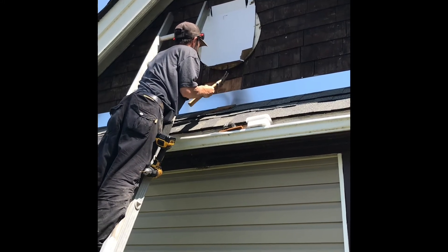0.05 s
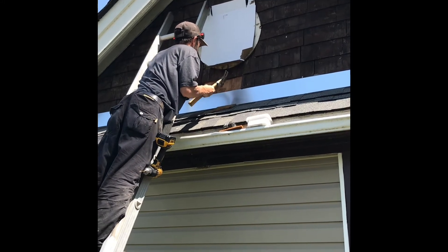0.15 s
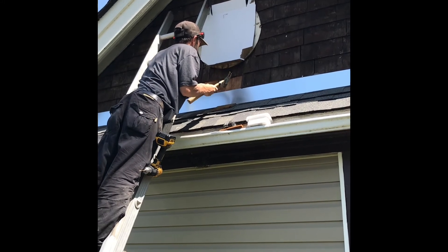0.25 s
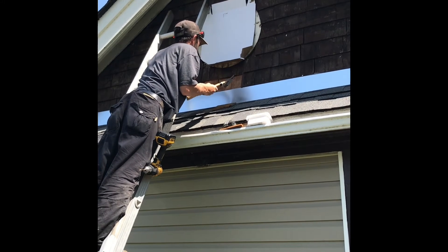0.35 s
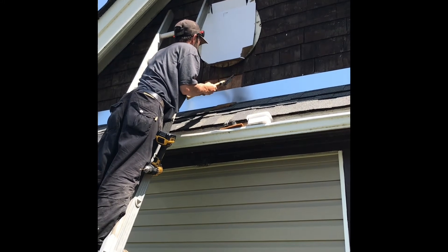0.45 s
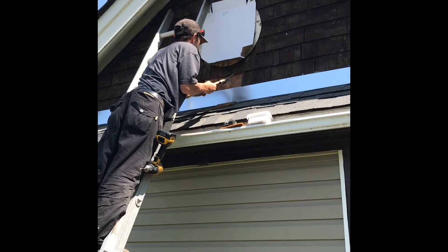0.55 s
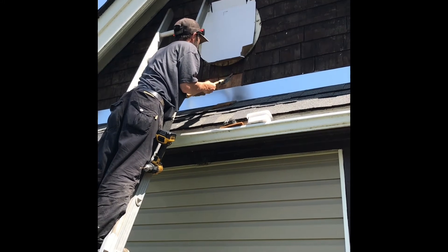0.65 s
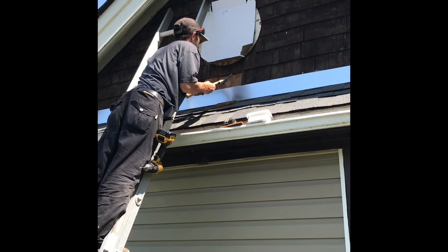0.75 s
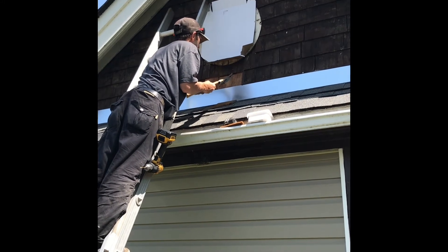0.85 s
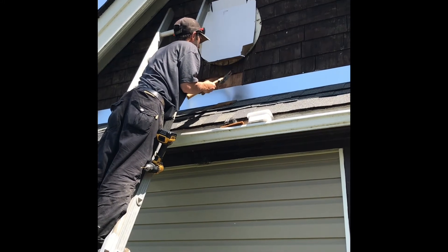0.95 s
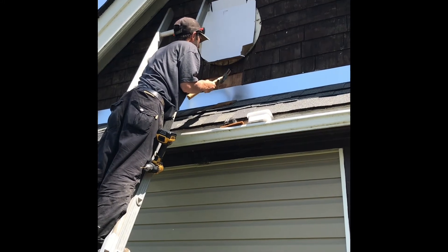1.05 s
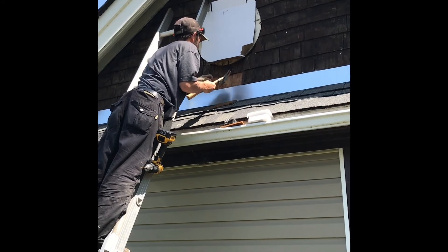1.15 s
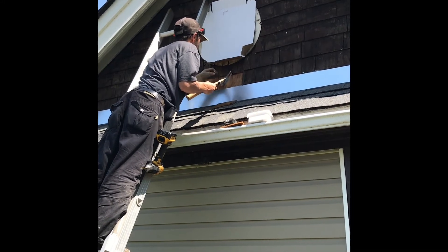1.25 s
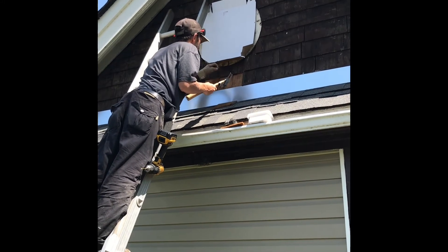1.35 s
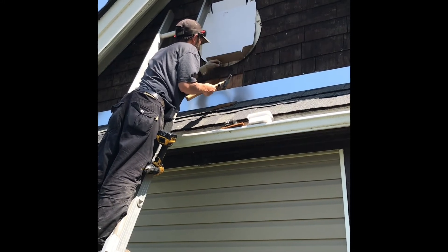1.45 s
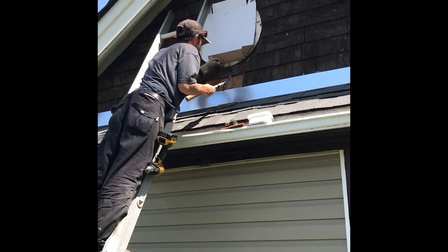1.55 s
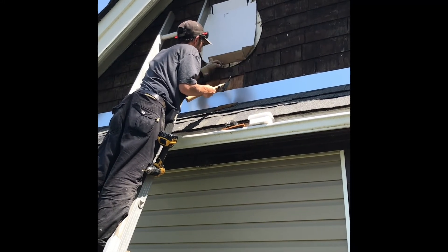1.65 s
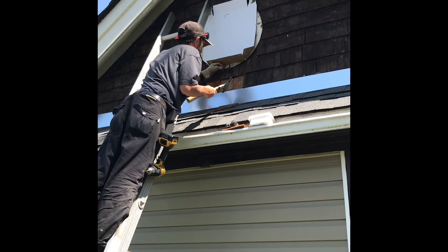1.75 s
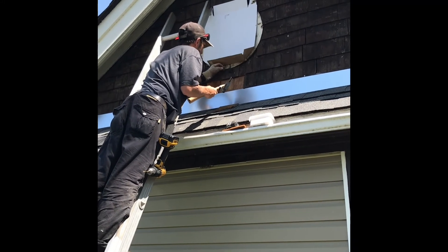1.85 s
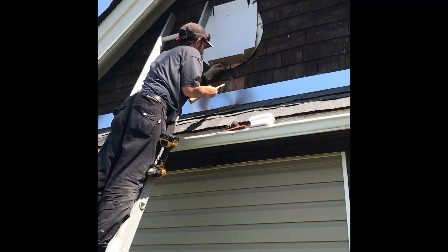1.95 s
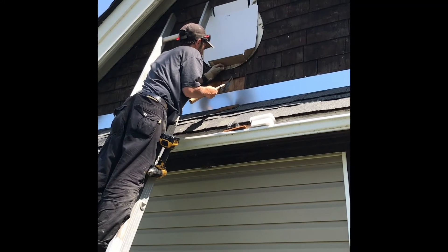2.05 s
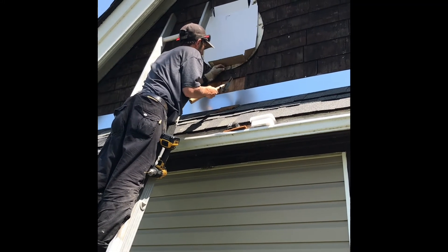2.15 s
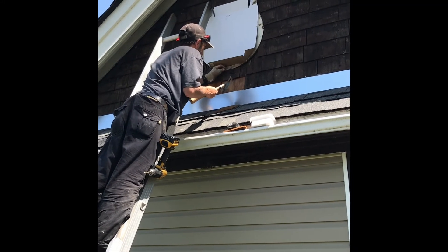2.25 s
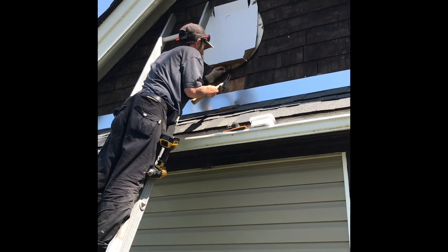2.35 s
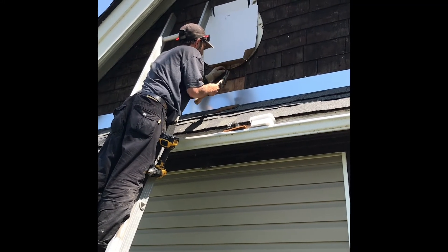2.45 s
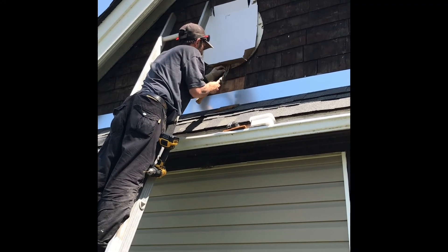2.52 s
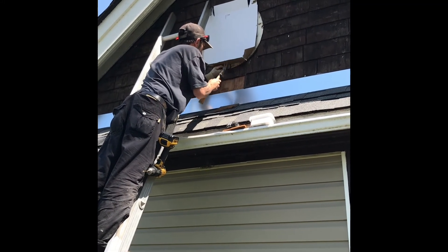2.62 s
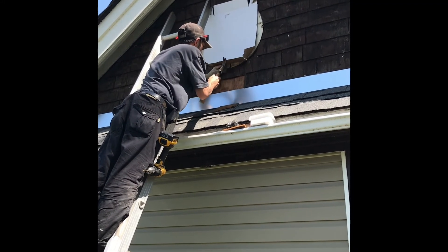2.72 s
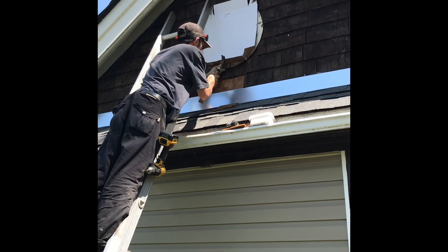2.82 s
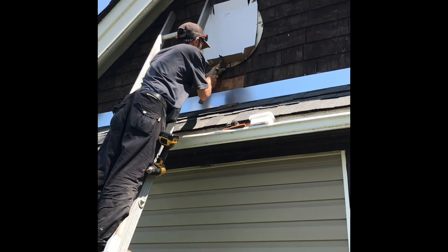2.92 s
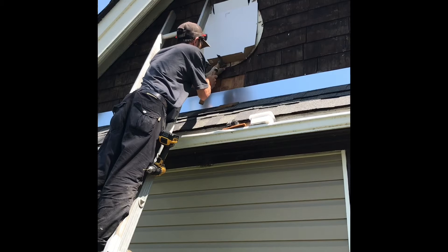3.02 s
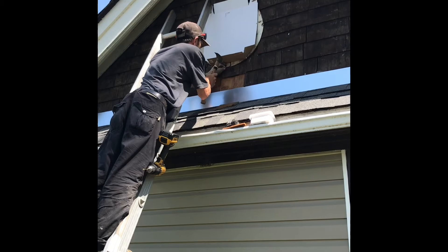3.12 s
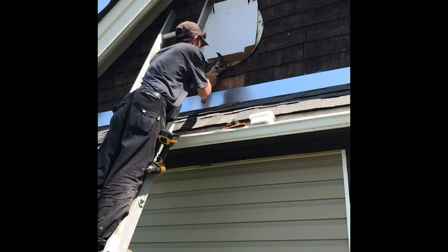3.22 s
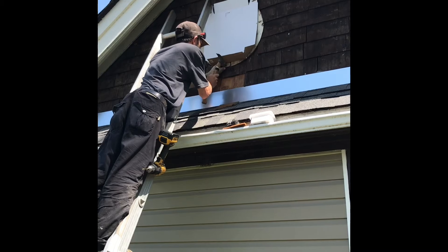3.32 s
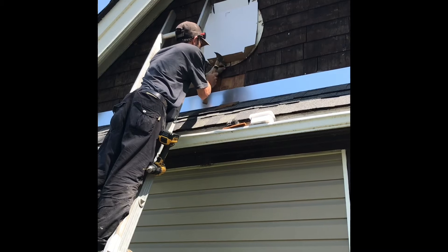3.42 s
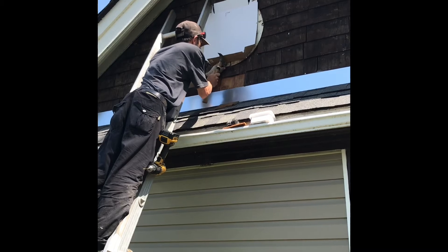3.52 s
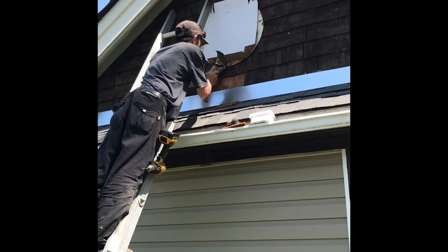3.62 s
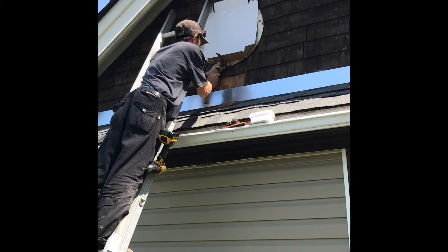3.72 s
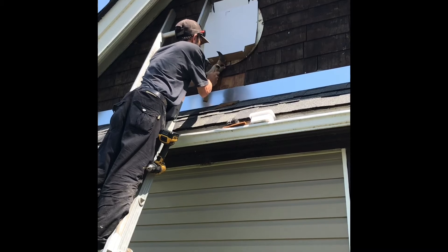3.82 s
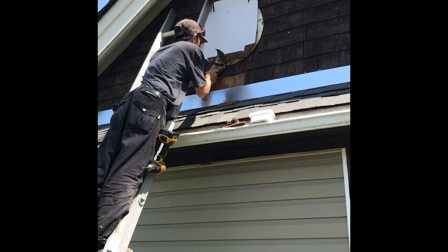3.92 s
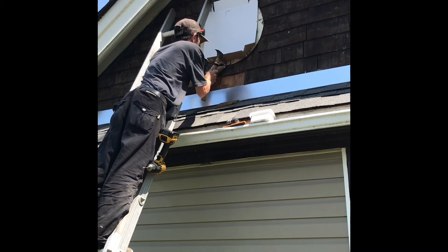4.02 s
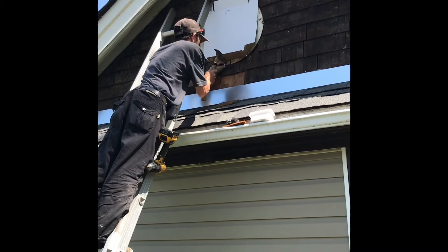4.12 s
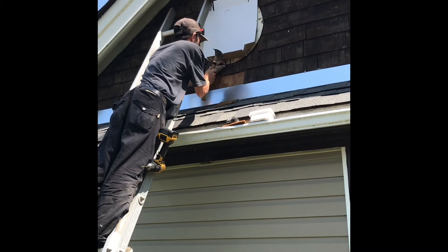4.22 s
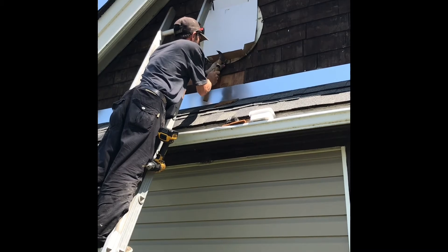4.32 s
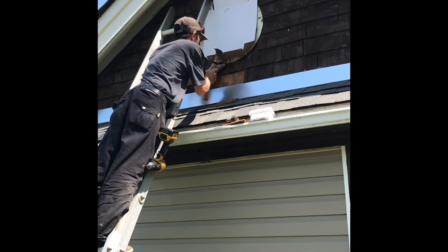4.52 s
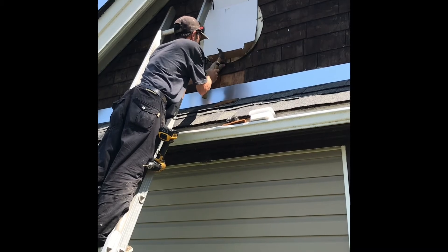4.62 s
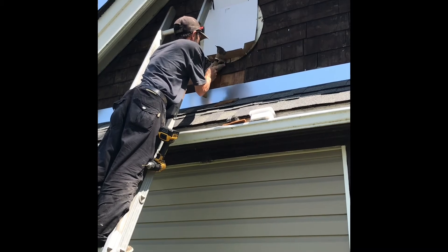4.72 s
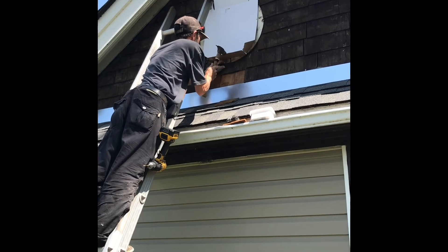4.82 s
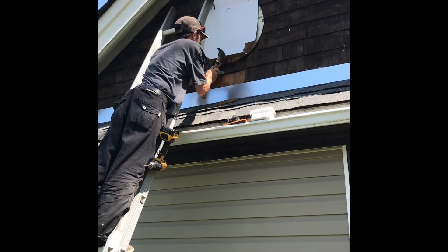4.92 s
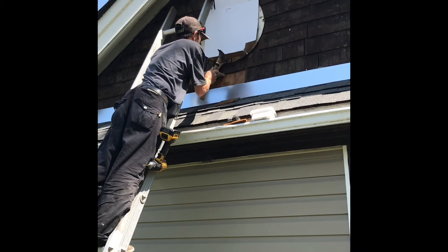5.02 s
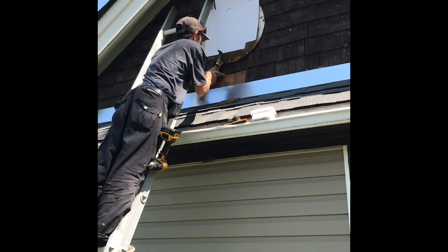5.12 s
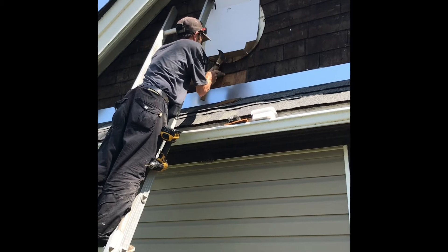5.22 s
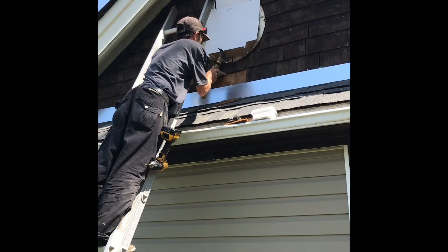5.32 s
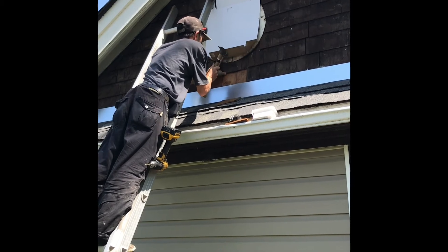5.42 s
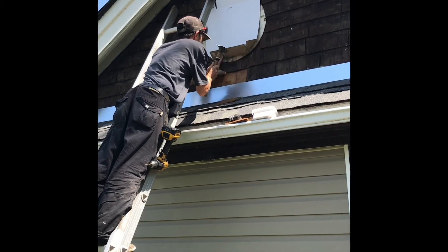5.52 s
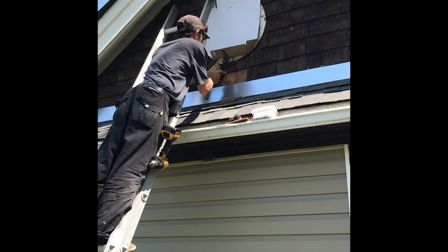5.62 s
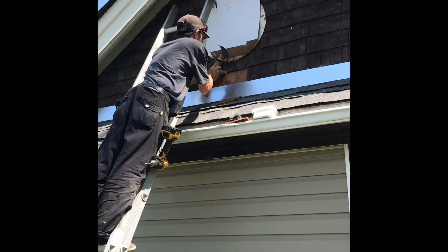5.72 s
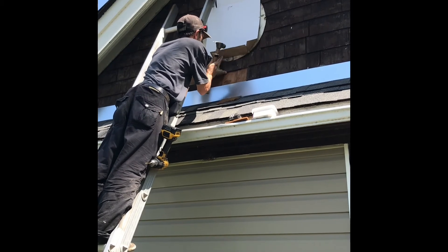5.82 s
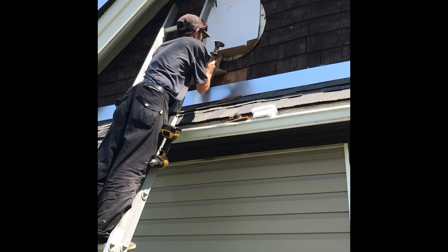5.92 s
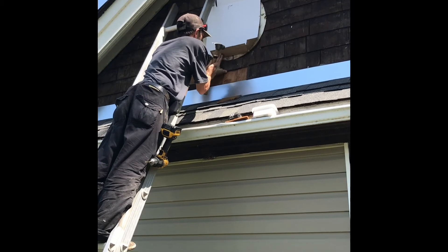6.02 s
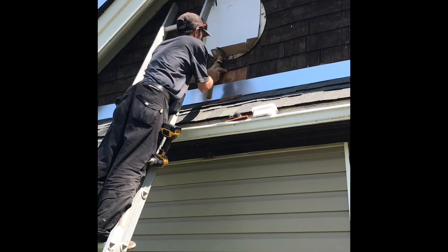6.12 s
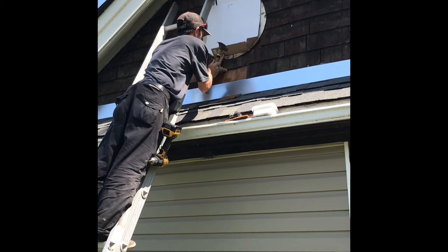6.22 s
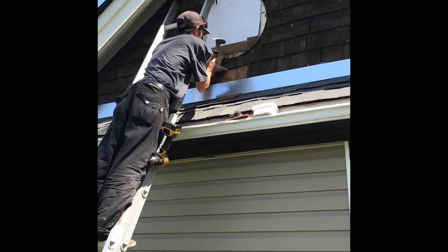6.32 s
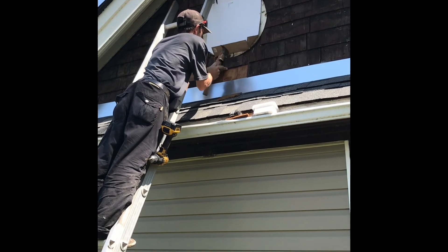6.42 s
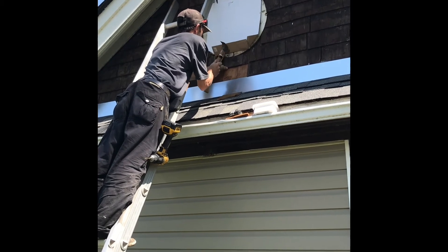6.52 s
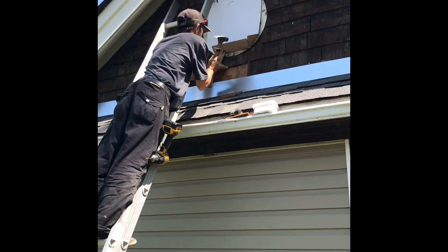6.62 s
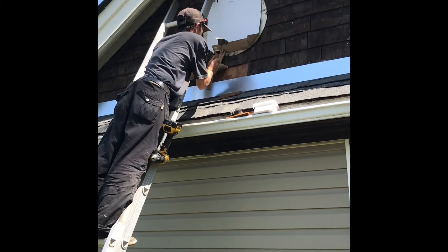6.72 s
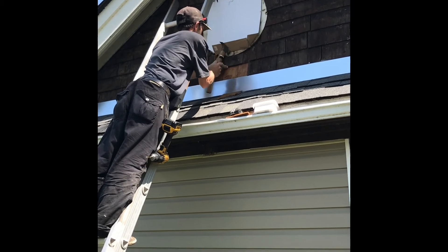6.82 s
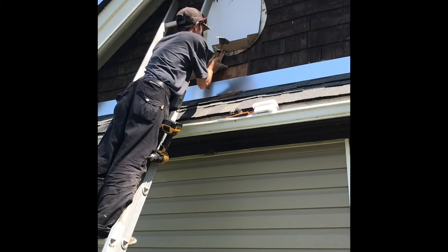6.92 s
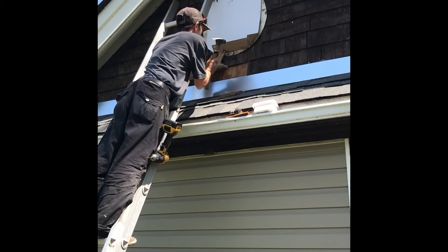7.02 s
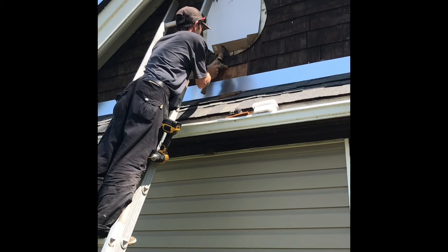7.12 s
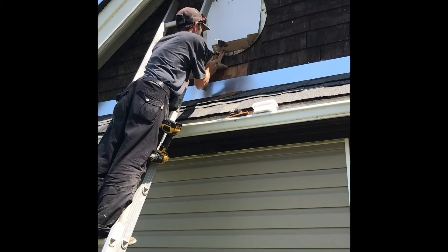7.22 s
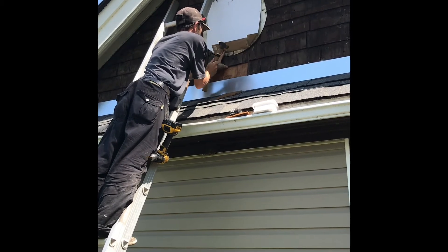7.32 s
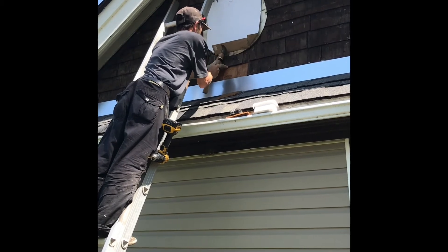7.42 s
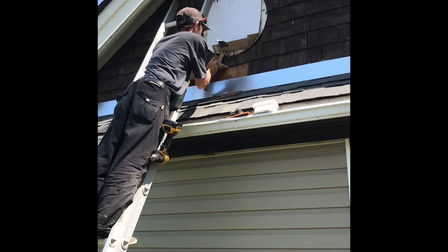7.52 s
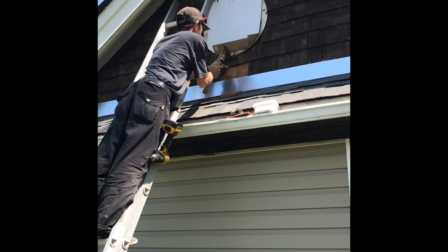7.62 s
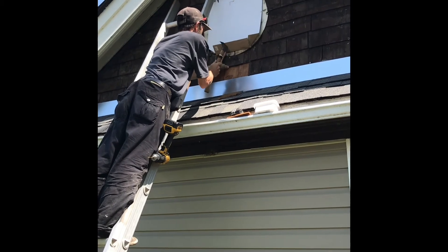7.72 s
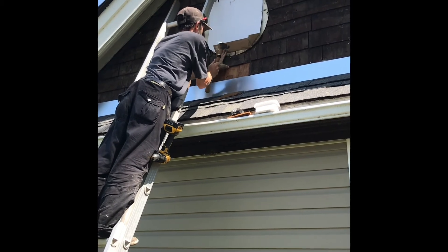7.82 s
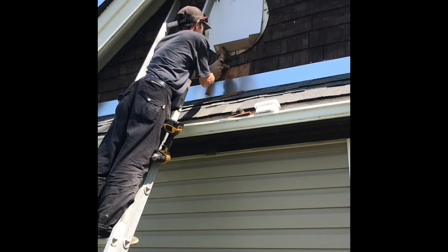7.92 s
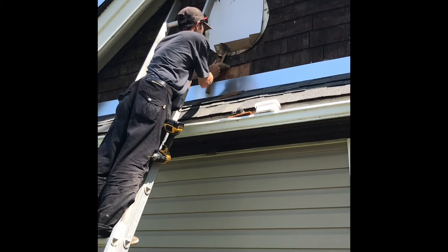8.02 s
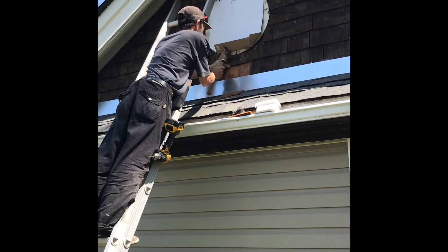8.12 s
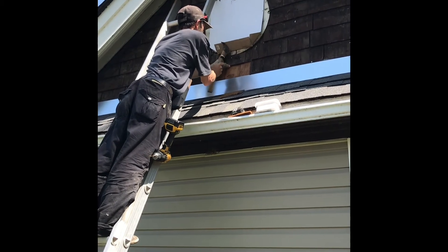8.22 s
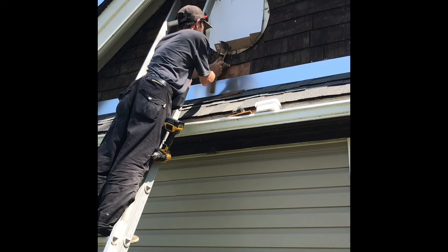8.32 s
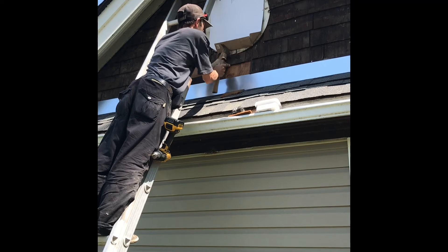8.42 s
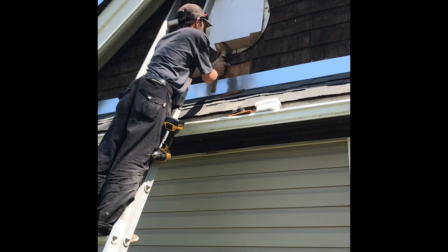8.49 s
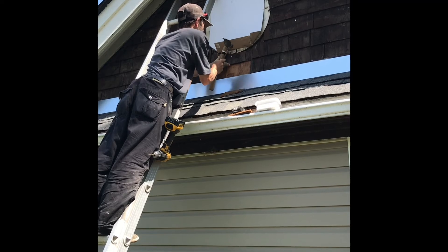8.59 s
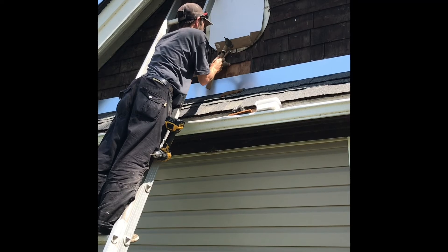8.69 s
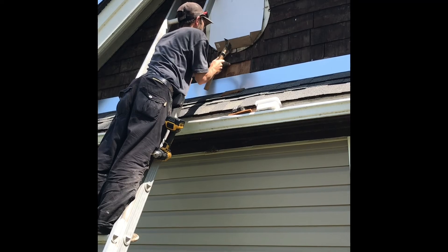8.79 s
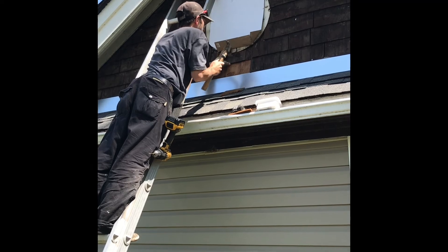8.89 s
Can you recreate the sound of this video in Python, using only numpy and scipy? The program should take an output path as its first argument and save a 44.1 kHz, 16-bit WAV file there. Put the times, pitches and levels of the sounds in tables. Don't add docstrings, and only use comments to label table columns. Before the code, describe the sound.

A mono outdoor scene, heard from a lawn a few metres from a wooden wall. From 0 to 3.3 seconds there is only soft distant traffic rumble, a faint low engine drone swelling and fading, and tiny glove rubs, with a thin rising squeak near 1.5. Hammering begins with a light tap at 3.3, a firmer one at 3.55, and a hard crack at 3.8 with a little bounce. Loud blows follow at 4.3 and 4.6. A pause holds faint rustles and dull bumps around 5 seconds. Strikes return at 5.7, 6.2, 6.5 and 6.8, then run steadily about every quarter second from 7.1 to 8.4, with slight rebounds. Each is a dry, bright steel crack with woody knock, hollow low boom, sheet clatter and faint metallic ringing. Quiet echoes trail off yard surfaces. After 8.5, the tail fades into traffic and drone.

```python
import sys
import numpy as np
from scipy import signal
from scipy.io import wavfile
from scipy.ndimage import uniform_filter1d

SR = 44100
rng = np.random.default_rng(int(sys.argv[2]) if len(sys.argv) > 2 else 0)


def voltage_ratio(decibels):
    exponent = np.asarray(decibels, float) / 20
    return 10 ** exponent


def transcribe(signal):
    frames = np.atleast_2d(signal).T
    limited = np.clip(frames, -1, 1)
    pcm = np.round(limited * 32767).astype(np.int16)
    wavfile.write(sys.argv[1], SR, pcm)


N = 394689

# (time [s], crack peak [dB], boards [dB re crack], cavity [dB re crack],
# contact hardness [dB at 16 kHz])
BLOWS = [(3.3391, -24, -13, -14, 5), (3.5526, -13, -11, -16, -2), (3.7705, -7, -5.5, -17.5, 1.5),
         (3.8328, -24, -9.5, -18, 1), (4.343, -5, -9.5, -17, 2), (4.6146, -4, -8, -17.5, 4),
         (5.6705, -4.5, -9.5, -15, 2), (6.162, -4.5, -7, -14.5, 2.5), (6.4885, -3.5, -7.5, -16, 0),
         (6.8323, -3, -9, -18, 1.5), (7.142, -2.5, -11.5, -21, 3.5), (7.4196, -5, -9.5, -22, 4.5),
         (7.4559, -28.5, -4, -9, 6.5), (7.6795, -5.5, -11, -25.5, 4.5), (7.9354, -5.5, -12.5, -23.5, 1.5),
         (8.183, -4.5, -11.5, -19, -1.5), (8.4252, -4.5, -6.5, -15.5, 2.5), (8.4823, -21, -10, -17, -7.5)]
# (frequency [Hz], level [dB], t60 [s])
CRACK_MODES = [(2440, -9, 0.0063), (3447, -9, .005), (4330, -2.5, 0.0039), (5550, 1.5, .0045),
               (6290, -2, .0035), (7205, -6, .003), (7970, -8, 0.0033), (8880, -2.5, .0035),
               (9910, -4, .0035), (11300, -11, 0.0025), (12900, -18, 0.0045), (14000, -21.5, .004),
               (15300, -26.5, .004)]
# (frequency [Hz], level [dB], t60 [s])
STUD_BOARD_MODES = [(600.6, -14, 0.092), (801, -10.5, 0.062), (920, -2, 0.028), (1019, 0.5, 0.032),
                    (1076, -4, 0.051), (1254, 6, 0.027), (1337, 7, 0.017), (1530, -3, 0.018),
                    (1908, -24.5, 0.013), (2010, -9, 0.013), (2263, -15.5, 0.022)]
# (frequency [Hz], level [dB], t60 [s])
LOOSE_BOARD_MODES = [(675, -13, .045), (775, -10, .04), (884, 0, .045), (1010, -9, .04), (1095, -7, .045),
                     (1232, -3, .035), (1340, -5, .025), (1640, -10, .03), (1840, -8, .035),
                     (2095, -10, .035), (2250, -9, .035)]
# (frequency [Hz], level [dB], t60 [s])
CAVITY_MODES = [(95, -20, .1), (121.4, -0.5, .065), (178.8, 0, .085), (258.3, -2.5, 0.064),
                (354.3, -11, .085)]
# (frequency [Hz], level [dB], t60 [s])
CLATTER_BANDS = [(441, -16, 0.17), (877, -3, 0.099), (1740, -7, 0.095), (2560, -5.5, 0.061),
                 (4400, -6.5, 0.075), (6370, -13.5, 0.073), (8600, -9, 0.051), (12000, -21.5, 0.059),
                 (14500, -26.5, .05)]
# (time [s], head level [dB], claw level [dB])
RINGS = [(3.552, -60, -50), (4.343, -51, -39), (4.615, -51, -37), (5.67, -41, -36), (6.162, -41, -30),
         (6.489, -33.5, -36), (6.832, -42, -39), (7.142, -47, -25), (7.42, -43, -24), (7.679, -47, -44),
         (7.935, -35, -32), (8.182, -45, -41), (8.425, -38, -34)]
# (frequency [Hz], level [dB], t60 [s])
HEAD_MODES = [(5652, -1, .14), (5749, 0, .28), (6541, -16, .12)]
# (frequency [Hz], level [dB], t60 [s])
CLAW_MODES = [(4226, -12, .1), (4883, 0, .13), (5114, -8, .14)]
# (time [s], peak level [dB], pitch [Hz])
KNOCKS = [
    (2.7, -56, 3000),
    (4.955, -35.5, 480),
    (5.75, -37, 480),
    (6.116, -37.5, 697),
]
# (delay [s], level [dB])
SLAPS = [(.155, -50.5), (.1752, -47), (.188, -45.5), (.1925, -47), (.1966, -42), (.203, -43.5),
         (.21, -47.5), (.236, -48.5), (.35, -47)]
# (first return [s], level [dB], t60 [s])
OBSTACLES = [(.035, -43.5, 0.58), (.18, -48.5, .9), (.27, -53.5, .5), (.335, -50, .3), (.43, -57.5, .6)]
# (frequency [Hz], level [dB])
FOLIAGE = [(200, 0), (400, -12), (800, -6), (1300, 2), (2100, -5.5), (3300, -2.5), (5200, 0), (8000, -2),
           (12500, -4.5)]
# (start [s], length [s], level [dB], brightness [dB per octave])
RUBS = [(1.08, .04, -80, 1.5), (1.43, .07, -70, 9), (1.498, .07, -64, 4), (1.538, 0.067, -63.5, -3),
        (1.665, 0.079, -71, 3), (1.72, .075, -66, -2), (2.345, .06, -70, -5), (2.87, .065, -71, 0.5),
        (4.862, .08, -69, 1.5), (4.917, .09, -66.5, -1), (5.08, .04, -74, 1), (5.13, .045, -73, 2.5),
        (5.432, .11, -62.5, 0), (5.98, .065, -68.5, 1), (6.107, .025, -67, -5)]
# (frequency [Hz], width [Hz], level [dB])
RUB_BANDS = [(3600, 3000, -6), (7500, 5900, 1), (13800, 6100, -2.5)]
# (time [s], frequency [Hz], level [dB])
SQUEAK = [
    (1.505, 4850, -90),
    (1.512, 4900, -66),
    (1.535, 5100, -69),
    (1.565, 5250, -57),
    (1.575, 5250, -90),
]
# (frequency ratio, level [dB])
SQUEAK_PARTIALS = [(.46, -2), (1, 0), (1.12, -9), (1.37, -6)]
# (multiple of the fundamental, level [dB])
DRONE_ORDERS = [(1, -5.5), (2, 1), (3, -15)]
DRONE_SWELLS = [(.55, .3, -54.5), (1.35, .2, -62), (2.2, 0.23, -61), (4.497, .15, -55.5),
                (5.417, 0.14, -55), (6.02, .15, -50.5), (6.38, .12, -52), (6.93, .2, -54.5),
                (8.117, 0.22, -53), (8.784, 0.31, -46)]
# (frequency [Hz], density [dB per Hz])
TRAFFIC_SPECTRUM = [(40, -0.5), (70, 1), (115, 0.5), (170, -8.5), (260, -18.5), (330, -12.5), (480, -23.5),
                    (1000, -18.5), (1800, -27), (2600, -34.5), (3200, -31.5), (4400, -42.5), (6000, -42),
                    (9000, -59)]
# (frequency [Hz], width [Hz], level [dB])
MACHINE_HUMPS = [(355, 25, -66), (1047, 26, -65.5), (1744, 14, -70), (3670, 20, -83)]
# (time [s], level [dB])
ROAD_SWELL = [(0, -1), (1.5, 0.5), (3.2, 0), (4.2, -0.5), (5.2, 0.5), (6.2, 2), (7.0, 0.5), (7.8, -1),
              (8.6, 1.5), (8.95, -1)]

CLATTER_DB, CLATTER_PER_BOARDS, CLATTER_PER_HARDNESS = -13, 0.46, 0.45
LOOSE_FROM_S, LOOSE_TO_S = 7.3, 8.0
GROUND_S, GROUND_DB, GROUND_HZ = .00905, -15.5, 5000
SHED_S, SHED_HZ, SHED_DB, SHED_T60_S = .188, 828, -42, .16
OBSTACLE_RISE_S, AIR_DB_PER_S_HZ = .012, .0079
RUB_ATTACK, RUB_RELEASE = 0.37, .3


def band(x, hz, width):
    edges = np.clip([hz - width / 2, hz + width / 2], 10, .49 * SR)
    return signal.sosfilt(signal.butter(2, edges, "band", fs=SR, output="sos"), x)


def unit(x):
    return x / np.sqrt(np.mean(x ** 2))


def hiss(count, hz, share):
    return unit(band(rng.standard_normal(count), hz, share * hz))


def walk(rate):
    hold = int(SR / rate)
    steps = np.repeat(rng.standard_normal(N // hold + 1), hold)
    return unit(uniform_filter1d(uniform_filter1d(steps, hold), hold)[:N])


def ring(modes, t, rise, scatter_db, drift, tilt_db=0, sign=1):
    hz, db, t60 = np.transpose(modes)[:, :, None]
    chance = rng.standard_normal((2, len(modes), 1))
    polarity = sign ** np.arange(len(modes))[:, None]
    swing = -np.sin(2 * np.pi * hz * (1 + drift * chance[0]) * t) * polarity
    db = db + scatter_db * chance[1] + tilt_db * np.log2(hz / hz.mean())
    out = np.sum(voltage_ratio(db - 60 * t / t60) * swing, axis=0) * (1 - np.exp(-t / rise)) ** 2
    return out / np.abs(out).max()


def add(out, s, x):
    i = int(s * SR)
    out[i:i + len(x)] += x[:N - i]


def hammer():
    out, t = np.zeros(N), np.arange(SR // 5) / SR
    rattles = []
    for hz, db, t60 in CLATTER_BANDS:
        noise = hiss(len(BLOWS) * len(t), hz, share=0.55).reshape(len(BLOWS), -1)
        rattles.append(voltage_ratio(db - 60 * t / t60) * noise)
    onset = 1 - np.exp(-t / 0.00077)
    for k, (s, crack_db, boards_db, cavity_db, hardness_db) in enumerate(BLOWS):
        boards = LOOSE_BOARD_MODES if LOOSE_FROM_S < s < LOOSE_TO_S else STUD_BOARD_MODES
        crack = ring(CRACK_MODES, t[:SR // 50], .00006, 1.8, .015, hardness_db / 2, sign=-1)
        wood = ring(boards, t[:SR // 8], .0007, 1.5, .004)
        boom = ring(CAVITY_MODES, t, .003, .8, .006)
        thump = ring([(45, 0, .16)], t, .004, 0, .03)
        clatter = 0
        for (hz, _, _), rattle in zip(CLATTER_BANDS, rattles):
            clatter = clatter + onset * voltage_ratio(hardness_db / 2 * np.log2(hz / 4000)) * rattle[k]
        clatter_db = CLATTER_DB + CLATTER_PER_BOARDS * boards_db + CLATTER_PER_HARDNESS * hardness_db
        parts = [(0.4, -crack), (boards_db + 0.5, wood), (cavity_db + 6.0, boom),
                 (clatter_db, clatter), (-27.5, thump)]
        for db, part in parts:
            add(out, s - .00005, voltage_ratio(crack_db + 6.0 + db) * part)
    t = np.arange(SR // 4) / SR
    for s, head_db, claw_db in RINGS:
        head = ring(HEAD_MODES, t, .002, 1.0, .0004)
        claw = ring(CLAW_MODES, t, .002, 1.0, .0004)
        add(out, s, voltage_ratio(head_db) * head + voltage_ratio(claw_db) * claw)
    return out


def knocks():
    out, t = np.zeros(N), np.arange(SR // 8) / SR
    for s, db, hz in KNOCKS:
        bump = voltage_ratio(db - 60 * t / .05) * (1 - np.exp(-t / .002))
        add(out, s, bump * hiss(len(t), hz, share=1.1))
    add(out, 7.2965, voltage_ratio(-36.5) * ring([(1450, 0, .012)], t, .001, 0, 0))
    return out


def yard(dry):
    t = np.arange(SR // 2) / SR
    echo = np.zeros(len(t))
    for delay, db in SLAPS:
        echo[int(delay * SR)] = voltage_ratio(db)
    echo = signal.lfilter(*signal.butter(2, 11000, fs=SR), echo)
    hum = voltage_ratio(SHED_DB - 32 - 60 * (t - SHED_S) / SHED_T60_S) * np.sin(2 * np.pi * SHED_HZ * t)
    echo += (t > SHED_S) * hum
    delayed = np.roll(dry, int(GROUND_S * SR))
    lawn = signal.lfilter(*signal.butter(1, [500, GROUND_HZ], "band", fs=SR), delayed)
    return dry + voltage_ratio(GROUND_DB) * lawn + signal.fftconvolve(dry, echo)[:N]


def scatter():
    out, t = 0, np.arange(int(.7 * SR)) / SR
    swell = 0
    for s, db, t60 in OBSTACLES:
        late = np.maximum(t - s, 0)
        swell = swell + voltage_ratio(db - 60 * late / t60) * (1 - np.exp(-late / OBSTACLE_RISE_S))
    swell = swell * voltage_ratio(2.2 * walk(200)[:len(t)])
    for hz, db in FOLIAGE:
        power = np.zeros(N)
        lumps_db = 1.9 * walk(70)[:len(t)]
        tail = swell * voltage_ratio(db + lumps_db - t * hz * AIR_DB_PER_S_HZ)
        for s, crack_db, *_ in BLOWS:
            add(power, s, (voltage_ratio(crack_db) * tail) ** 2)
        out = out + np.sqrt(power) * hiss(N, hz, share=0.49)
    return out


def rubs():
    out = 0
    for hz, width, band_db in RUB_BANDS:
        gain = np.zeros(N)
        for s, length, db, bright_db in RUBS:
            share = np.linspace(0, 1, int(length * SR))
            shape = np.clip(np.minimum(share / RUB_ATTACK, (1 - share) / RUB_RELEASE), 0, 1)
            add(gain, s, voltage_ratio(db + band_db + bright_db * np.log2(hz / 9000)) * shape)
        grain = voltage_ratio(2.5 * walk(120))
        out = out + gain * grain * unit(band(rng.standard_normal(N), hz, width))
    return out


def squeak():
    s, hz, db = np.transpose(SQUEAK)
    t = np.arange(N) / SR
    pitch = np.interp(t, s, hz) * (1 + 0.012 * walk(150))
    phase = 2 * np.pi * np.cumsum(pitch) / SR
    partials = 0
    for ratio, part_db in SQUEAK_PARTIALS:
        partials = partials + voltage_ratio(part_db - 1 + 3 * walk(70)) * np.sin(ratio * phase)
    return voltage_ratio(np.interp(t, s, db, left=-200, right=-200)) * partials


def drone():
    t = np.arange(N) / SR
    phase = 2 * np.pi * np.cumsum(97 * (1 + 0.0045 * walk(1.7))) / SR
    gain = sum(voltage_ratio(db) * np.exp(-((t - s) / half) ** 2) for s, half, db in DRONE_SWELLS)
    return gain * sum(voltage_ratio(db + 2.2 * walk(2.5)) * np.sin(k * phase) for k, db in DRONE_ORDERS)


def traffic():
    swell_db = np.interp(np.arange(N) / SR, *np.transpose(ROAD_SWELL))
    sway_db = walk(1.5)
    hzs, dbs = np.transpose(TRAFFIC_SPECTRUM)
    out = 0
    for hz in 30 * 2 ** np.arange(0, 9.2, 1 / 3):
        low = 1 / (1 + (hz / 250) ** 2)
        db = np.interp(np.log(hz), np.log(hzs), dbs) + 10 * np.log10(hz)
        db = db + swell_db + low * sway_db + (.8 + 1.2 * low) * walk(6)
        out = out + voltage_ratio(db) * hiss(N, hz, share=.26)
    humps = sum(voltage_ratio(db) * unit(band(rng.standard_normal(N), hz, width)) for hz, width, db in MACHINE_HUMPS)
    return voltage_ratio(-44.5) * unit(out) + voltage_ratio(swell_db) * humps


def scene():
    blows = yard(hammer() + knocks()) + scatter()
    return (blows + rubs() + squeak() + drone() + traffic())[None]


def low_pass(x):
    return signal.sosfilt(signal.butter(12, 17020, fs=SR, output="sos"), x)


def record(dry):
    x = dry + voltage_ratio(-71.5) * rng.standard_normal(dry.shape)
    port_hz, port_width_hz, port_dip = 10360, 600, 0.68
    x = x - port_dip * signal.lfilter(*signal.iirpeak(port_hz, port_hz / port_width_hz, fs=SR), x)
    x = signal.sosfilt(signal.butter(6, 40, "high", fs=SR, output="sos"), x)
    x = np.clip(x, -.79, .79)
    x = signal.sosfilt(signal.ellip(5, .5, 36, 15500, fs=SR, output="sos"), x)
    x = signal.sosfilt(signal.ellip(6, .2, 50, 17000, fs=SR, output="sos"), x)
    treble = signal.sosfilt(signal.butter(2, [3800, 11000], "band", fs=SR, output="sos"), x)
    x = x + voltage_ratio(-40.5) * np.roll(treble, -1024) + voltage_ratio(-49.5) * np.roll(treble, -512)
    return low_pass(x)


dry = scene()
out = record(dry)
transcribe(out)
```